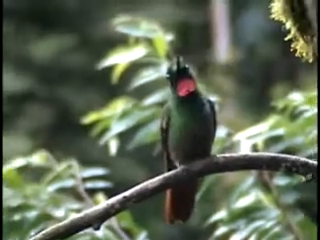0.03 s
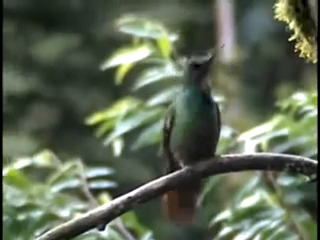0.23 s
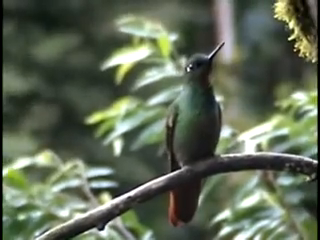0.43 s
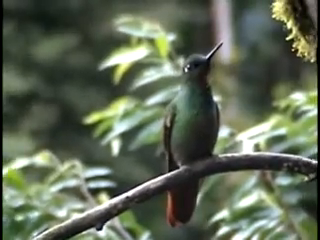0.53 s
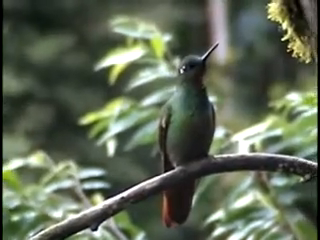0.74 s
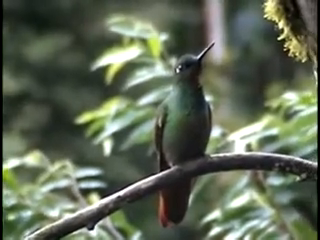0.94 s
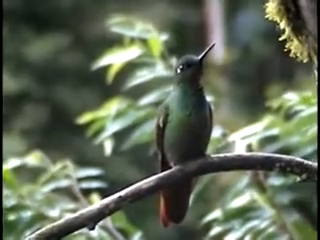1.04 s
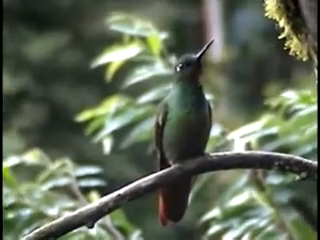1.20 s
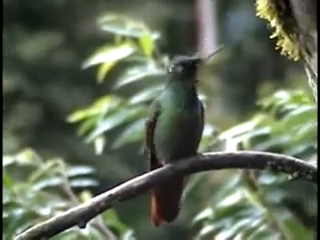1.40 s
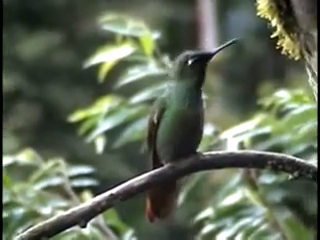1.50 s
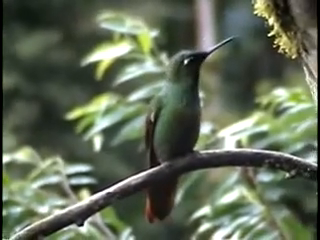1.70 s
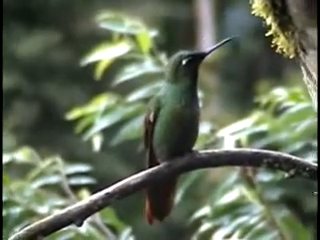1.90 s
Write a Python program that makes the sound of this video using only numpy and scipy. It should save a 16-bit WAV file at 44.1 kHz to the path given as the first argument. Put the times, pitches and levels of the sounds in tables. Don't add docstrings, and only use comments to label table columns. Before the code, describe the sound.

Two brief, high hummingbird squeaks, over a second apart, in hissy forest background with a sudden dropout

```python
import sys
import numpy as np
from scipy import signal
from scipy.io import wavfile
from scipy.ndimage import uniform_filter1d

SR = 44100
rng = np.random.default_rng(int(sys.argv[2]) if len(sys.argv) > 2 else 0)


def file_out(sig):
    cols = np.atleast_2d(sig).T
    lim = np.clip(cols, -1, 1)
    pcm = np.round(lim * 32767).astype(np.int16)
    wavfile.write(sys.argv[1], SR, pcm)


def to_linear_factor(level_db):
    exponent = np.asarray(level_db, float) / 20
    return 10 ** exponent


N = 85995

# (f/Hz, left-right likeness from 0 to 1)
SAME = [(60, 0.2), (640, 0.1), (1500, 0.074), (3300, 0.18), (3450, .97), (6800, 1), (11000, 1), (15000, .8)]
# (f/Hz, left minus right/dB)
TILT = [(60, -5.5), (150, -6.5), (380, -9.5), (950, -7), (2380, -3.5), (5980, 1.5), (15000, -2)]


def evened(x):
    return x / np.sqrt(np.mean(x ** 2) + 1e-20)


def read(points, hz):
    f, value = np.transpose(points)
    return np.interp(np.log(hz + 1), np.log(f + 1), value)


def drift(rate_hz, size):
    span = max(int(SR / rate_hz), 2)
    return evened(uniform_filter1d(uniform_filter1d(rng.standard_normal(size), span), span))


def sides(db):
    return to_linear_factor(np.array([[db / 2], [-db / 2]]))


def noise(shape, level_db, lo_hz, hi_hz, patchy_db, swell_db, same=SAME, tilt=TILT):
    frames, hz = N // 256 + 5, np.fft.rfftfreq(1024, 1 / SR)
    a, b, c, d, patches = rng.standard_normal((frames, 513, 5)).T
    patches = evened(uniform_filter1d(uniform_filter1d(patches, size=8, axis=0), size=10, axis=1))
    swell = evened(uniform_filter1d(rng.standard_normal(frames), size=30))

    like = np.clip(read(same, hz), -1, 1)[:, None]
    lean = to_linear_factor(read(tilt, hz)[:, None] / 2)
    left = a + 1j * b
    right = like * left + np.sqrt(1 - like ** 2) * (c + 1j * d)
    z = np.array([left * lean, right / lean])

    z *= to_linear_factor(read(shape, hz)[:, None] + patchy_db * patches + swell_db * swell)
    z *= ((hz >= lo_hz) & (hz < hi_hz))[:, None]
    out = signal.istft(z, nperseg=1024, noverlap=768)[1][:, :N]
    return to_linear_factor(level_db) * out / np.std(out.mean(0))


def idle():
    # (f/Hz, density/dB per Hz)
    rumble = [(25, -3.5), (48, -8), (90, -10.5), (250, -23), (500, -31), (1200, -35.5), (2500, -40.5),
              (15700, -41)]
    # (f/Hz, rms level/dB)
    hum_tones = [(48, -79), (583, -95), (11870, -112), (15600, -108)]
    t = np.arange(N) / SR
    hum = sum(np.sqrt(2) * to_linear_factor(db) * np.sin(2 * np.pi * hz * t) for hz, db in hum_tones)
    return hum + noise(rumble, -83.5, 20, 16000, patchy_db=-1.7, swell_db=1.8,
                       same=[(20, 1.0), (9000, 0.81)], tilt=[(20, .1), (9000, .1)])


def water_wash():
    # (f/Hz, density/dB per Hz)
    wash = [(15, -45), (25, -19), (48, -9), (204, -8), (353, -5), (388, -5.5), (893, -5), (1210, -11.5),
            (2300, -15.5), (2990, -46), (5060, -120)]
    return noise(wash, -58, 20, 2300, patchy_db=1.5, swell_db=-0.56)


def hiss():
    # (f/Hz, density/dB per Hz)
    hiss_curve = [(2300, -12), (2650, -2), (3250, -9), (3750, -10), (6400, -9.5), (9200, -20), (11200, -26),
                  (15800, -36)]
    return noise(hiss_curve, -62, 2300, 15000, patchy_db=2.84, swell_db=1.0)


def whine(lines, waver_db, rate_hz, spread, wander, gain_db):
    t, out = np.arange(N) / SR, np.zeros((2, N))
    for hz, db in lines:
        phase, lead = rng.random(2) * 2 * np.pi
        turn = 2 * np.pi * hz * t + phase + wander * drift(rate_hz, N)
        lead *= spread * np.sqrt(1 - np.clip(read(SAME, hz), 0, 1) ** 2)
        level = np.sqrt(2) * to_linear_factor(db + gain_db + waver_db * drift(rate_hz, N))
        out += level * sides(read(TILT, hz)) * np.cos([turn + lead, turn])
    return out


def motors():
    # (f/Hz, rms level/dB)
    reel = [(360.7, -69), (656.8, -73), (737.5, -75), (893.6, -72), (920.5, -68), (1314, -81), (1367, -81),
            (1593, -80), (1744, -82), (1986, -77), (2040, -80), (2331, -84)]
    drum = [(2460, -76), (2536, -79), (2622, -71), (2682, -70), (2907, -71), (3010, -78), (3130, -75),
            (3204, -70), (3498, -71), (3575, -71), (3801, -83), (3994, -80), (4118, -82), (4221, -78)]
    gears = [(4667, -81), (4888, -83), (5238, -80), (5335, -73), (5389, -76), (5561, -81), (5615, -80),
             (5835, -83), (6008, -72), (6062, -79), (6282, -77), (6336, -83), (6508, -78), (6568, -83)]
    bearing = [(6675, -78), (6729, -82), (6901, -81), (7127, -83), (7348, -81), (7569, -88), (7795, -88),
               (8500, -87), (9959, -93), (11057, -88), (11122, -91)]
    return (whine(reel, waver_db=1.5, rate_hz=27, spread=0.54, wander=0.52, gain_db=2.2)
            + whine(drum, waver_db=3.5, rate_hz=30, spread=0.24, wander=0.63, gain_db=0.8)
            + whine(gears, waver_db=3.0, rate_hz=27, spread=0.13, wander=0.63, gain_db=0.36)
            + whine(bearing, waver_db=3.5, rate_hz=52, spread=1.0, wander=1.3, gain_db=1.6))


def squeak(call):
    # (multiple of pitch, level/dB, left minus right/dB, left lead/rad)
    voice = [(1, 10, -7, 1.0), (2, 2.5, -0.3, 0.2), (3, 8, 1.5, 0.12), (4, -3, 1.8, 0.1),
             (5, -17.5, 4.5, 0.12), (6, -23.5, 3.3, 0.1), (7, -35, -2.5, 0.1)]
    # (f/Hz, level/dB)
    throat = [(3000, -8), (3800, 0), (4250, -1), (4650, -9), (5300, -2), (6300, 1), (9300, -5), (10200, 0)]
    jitter, skew_rad = 0.00072, 0.3
    flutter_db, flutter_hz = 0.73, 110

    s, hz, effort_db, beak_db = np.transpose(call)
    t = np.arange(N) / SR
    pitch = uniform_filter1d(np.interp(t, s, hz), size=90)
    turn = 2 * np.pi * np.cumsum(pitch * (1 + jitter * drift(340, N))) / SR
    edge = np.clip(np.minimum(t - s[0], s[-1] - t) / 0.00068, 0, 1)
    effort = edge * to_linear_factor(np.interp(t, s, effort_db))
    beak = np.interp(t, s, beak_db)

    out = np.zeros((2, N))
    for k, db, pan_db, lead in voice:
        flutter = flutter_db * np.sqrt(k) * drift(flutter_hz, N)
        tone_db = db + read(throat, k * pitch) + min(k - 1, 3) * beak + flutter
        phase = k * turn + skew_rad * k * k
        out += effort * to_linear_factor(tone_db) * sides(pan_db) * np.cos([phase + lead, phase])
    return out


def hummingbird():
    # (t/s, pitch f/Hz, effort level/dB, beak opening/dB per overtone)
    first_call = [
        (.2305, 1480, -43.5, 0.5),
        (.2342, 1724, -48, 2.2),
        (.238, 1924, -47, 1),
        (.244, 2029, -45, 1.8),
        (.254, 2025, -44.5, 1.1),
        (.286, 1966, -45.5, 0.8),
        (.303, 1926, -44, -2),
        (.3225, 1827, -50, -0.1),
        (.3285, 1710, -62, 3.7),
    ]
    second_call = [
        (1.5625, 1440, -48.5, 1.5),
        (1.567, 1664, -46.5, 1.5),
        (1.573, 1960, -49.5, 2),
        (1.579, 2000, -43.5, .5),
        (1.6, 2005, -44.5, 0.5),
        (1.61, 1956, -42, -2),
        (1.643, 1893, -44.5, 1),
        (1.652, 1807, -50, 0),
        (1.6635, 1684, -53, -2),
    ]
    return squeak(first_call) + squeak(second_call)


def forest(x):
    # (delay t/s, level/dB)
    bounces = [
        (.0031, -9.5),
        (.0072, -16),
        (0.0145, -15.5),
        (.019, -19.5),
    ]
    tail_db, t60_s, gap_s = -20, 0.5, 0.012
    t = np.arange(SR // 2) / SR
    near = np.zeros(len(t))
    for s, db in bounces:
        near[round(s * SR)] += to_linear_factor(db)
    taps = rng.standard_normal((2, len(t))) * (rng.random((2, len(t))) < .05)
    taps = (taps + taps[::-1]) * to_linear_factor(-60 * t / t60_s) * (t > gap_s)
    tail = to_linear_factor(tail_db) * taps / np.linalg.norm(taps[0])
    echo = signal.lfilter(*signal.butter(2, 3650, "high", fs=SR), near + tail)
    return x + signal.fftconvolve(x, echo, axes=1)[:, :N]


def blip(start_s, hz, decay_s, db):
    t = np.arange(N) / SR - start_s
    u = np.clip(t, 0, None) / decay_s
    return to_linear_factor(db) * u * np.exp(1 - u) * np.sin(2 * np.pi * hz * t)


def drips():
    # (t/s, f/Hz, decay t/s, level/dB, left minus right/dB)
    drops = [
        (.235, 730, .012, -57, -9),
        (.27, 750, .012, -56, -9),
        (.85, 760, .015, -55, -9),
        (1.08, 750, .012, -56, -9),
        (1.775, 680, .008, -55, -9),
    ]
    knock = [
        (1.6575, 850, .003, -51, -2),
        (1.657, 400, .004, -51, -9),
        (1.658, 1350, .0015, -52, 2),
        (1.667, 750, .003, -53, -9),
    ]
    return sum(blip(s, hz, decay_s, db) * sides(pan_db)
               for s, hz, decay_s, db, pan_db in [*drops, *knock])


def tick():
    return blip(.568, hz=14000, decay_s=.00005, db=-54)


def scene():
    return water_wash() + hiss() + motors() + forest(hummingbird()) + drips() + tick()


def roll_off(x):
    return signal.sosfilt(signal.butter(12, 15820, fs=SR, output="sos"), x)


def record(dry):
    open_s, drop_s, back_s = .157, .9297, 1.0607
    t = np.arange(N) / SR
    opened = np.clip((t - open_s) / 0.00157, 0, 1)
    kept = np.clip(np.maximum(drop_s - t, t - back_s) / 0.00033 + 1, 0, 1)
    line = idle() * (1 - 0.19 * opened)
    return roll_off((dry * opened + line) * kept)


dry = scene()
out = record(dry)
file_out(out)
```